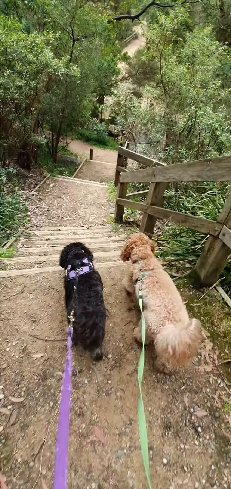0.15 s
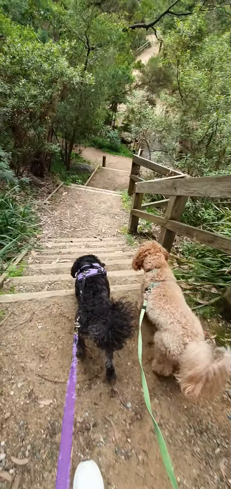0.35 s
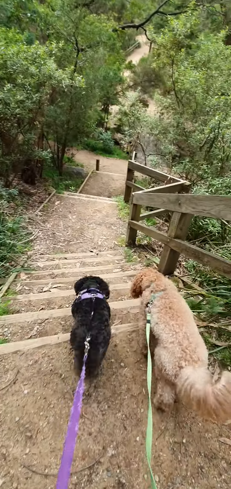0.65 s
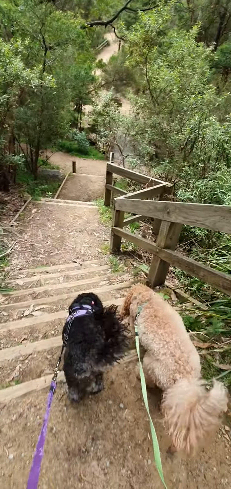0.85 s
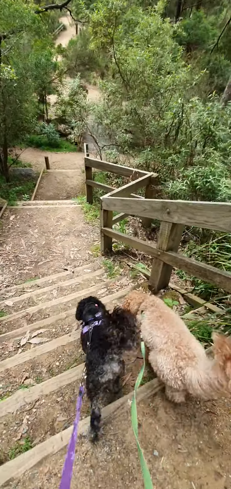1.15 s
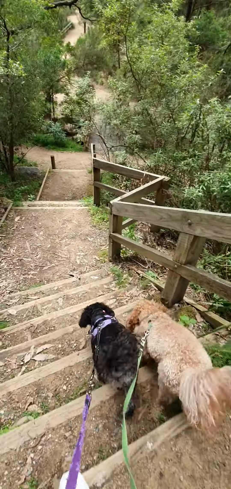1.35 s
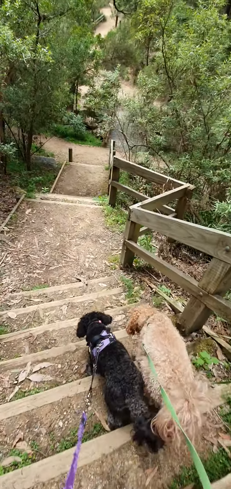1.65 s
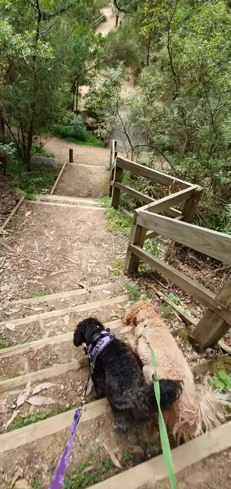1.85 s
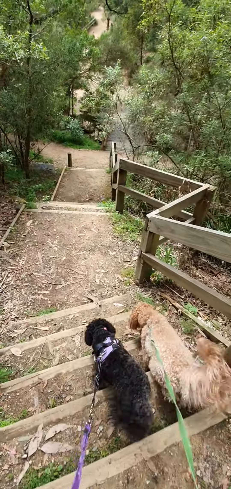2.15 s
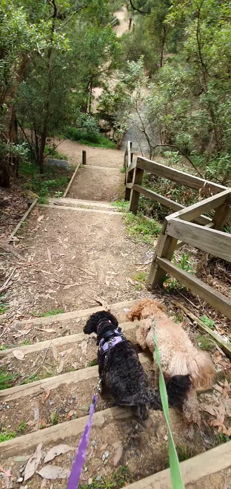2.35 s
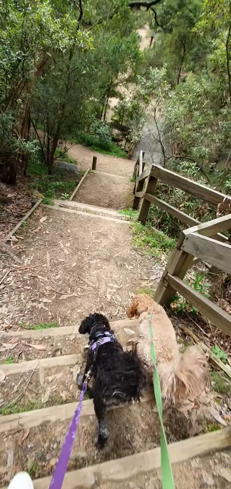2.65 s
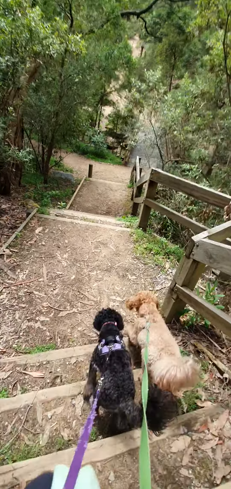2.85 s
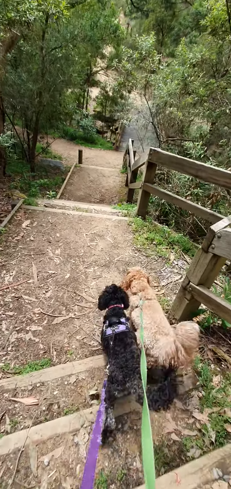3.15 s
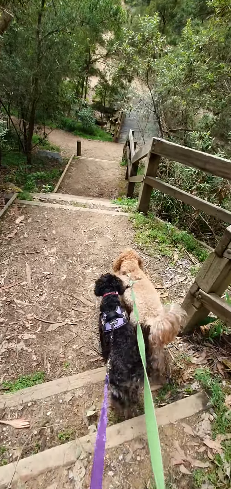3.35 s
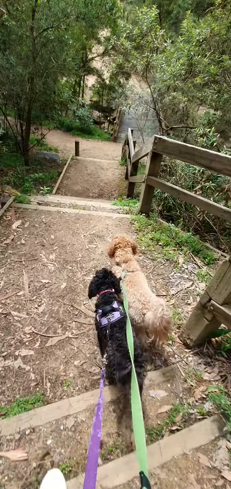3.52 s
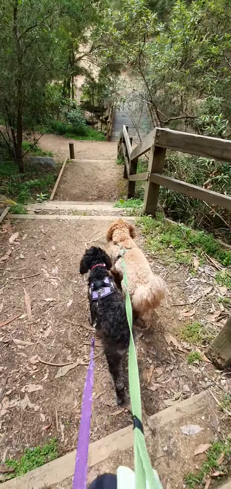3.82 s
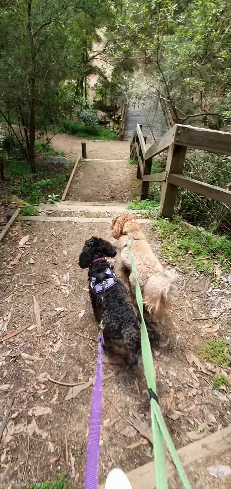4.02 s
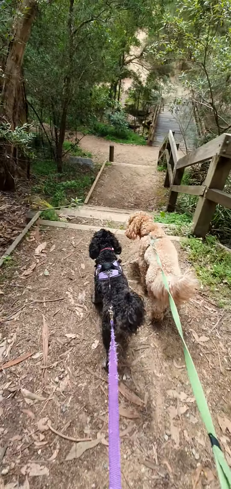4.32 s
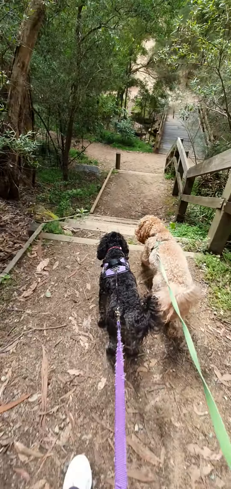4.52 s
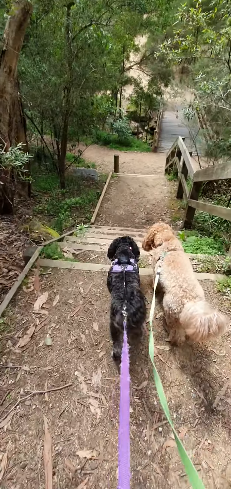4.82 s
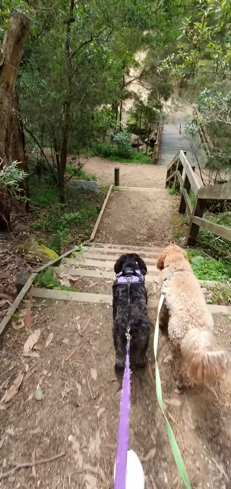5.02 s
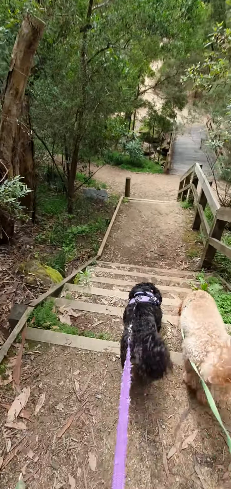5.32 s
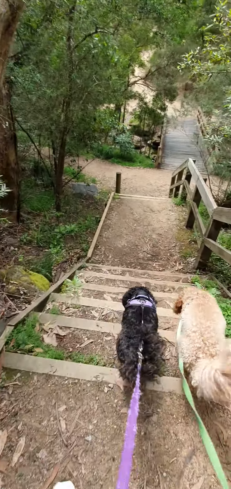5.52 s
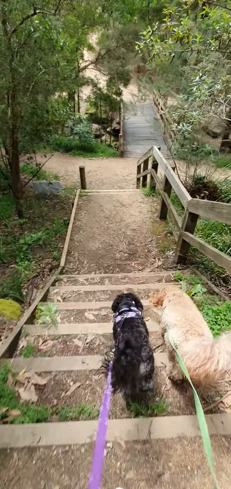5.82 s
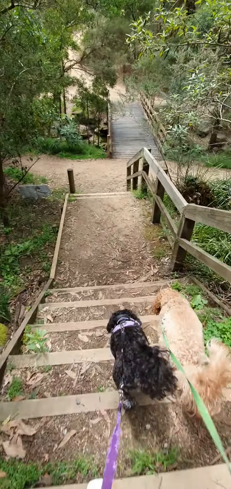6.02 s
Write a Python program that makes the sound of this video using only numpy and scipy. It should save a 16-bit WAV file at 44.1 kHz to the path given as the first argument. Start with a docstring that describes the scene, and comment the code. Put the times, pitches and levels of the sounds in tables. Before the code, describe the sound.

A walker and two leashed dogs go down timber-edged dirt steps in bushland. Gritty footfalls crunch over light paw patter and dry leaves. Small ticks come early, then a cluster of hollow lead-handle clacks around the middle. Little birds chirp throughout with airy echoes from the trees. Wind rumbles on the handheld microphone, mostly on the right.

```python
"""Shoes and paws scuff grit and dry leaves as a walker follows two leashed dogs down
timber-edged steps in bushland; lead fittings clack, small birds chirp, and a breeze buffets the microphone.
Grit and leaves are made of many tiny ringing grains; low thumps and metal are mostly fading sine tones.
Birds are gliding tones with an echo of shaped noise; wind is low noise, mostly stronger on the right."""
import sys
import numpy as np
from scipy import signal
from scipy.fft import rfft, irfft, next_fast_len
from scipy.io import wavfile
from scipy.ndimage import uniform_filter1d, map_coordinates

SR = 44100
rng = np.random.default_rng(int(sys.argv[2]) if len(sys.argv) > 2 else 0)


def digitize_waveform(pressure):
    """Quantize a signal to 16-bit integers and store it at the path in sys.argv[1].

    Rows of a 2-D input are taken as channels; values are limited to [-1, 1].
    """
    field = np.atleast_2d(pressure).T
    bounded = np.clip(field, -1, 1)
    quanta = np.round(bounded * 32767).astype(np.int16)
    wavfile.write(sys.argv[1], SR, quanta)


N = 272097
TIME = np.arange(N) / SR  # seconds

# Levels in these tables are relative: the functions below balance the layers.
# Gusts on the microphone. Each row: start in seconds, length in seconds, left level in dB, right level in dB.
GUSTS = [(0.024, 0.16, -51, -34), (0.997, 0.027, -54, -23.5), (1.125, 0.15, -55, -43.5),
         (1.421, 0.011, -41, -34.5), (1.478, 0.064, -49, -33), (1.894, 0.31, -56, -37.5),
         (2.041, 0.0075, -52, -31), (2.376, 0.02, -45, -51), (2.585, 0.69, -52, -43.5),
         (3.045, 0.018, -55, -33), (3.824, 0.19, -53.5, -50.5), (4.255, 0.036, -37.5, -46),
         (4.76, 0.047, -55, -39), (4.803, 0.02, -67, -31.5), (5.756, 0.011, -53, -39)]
GUST_RISE_S, GUST_FALL_S = 0.11, 0.16  # time to swell and to fade by 60 dB
# Light air between the gusts; the right port is more exposed.
AIR_DB, AIR_RIGHT_DB, AIR_WAVER_DB = -60.5, 4.5, 5.5
# Tone colour of the wind's low rumble. Each row: frequency in Hz, level in dB.
RUMBLE = [(15, -47), (30, -18.5), (55, 4), (88, 0.5), (125, -14), (200, -28.5), (600, -59), (1500, -74)]
# Tone colour of the faster wind flutter. Each row: frequency in Hz, level in dB.
FLUTTER = [(50, -22), (110, -0.5), (220, 1), (400, -25), (900, -48.5)]
# Tone colour of the steady bush hush. Each row: frequency in Hz, level in dB.
BUSH = [(88, -24), (150, 0), (341, -1.5), (484, -8.5), (2870, -26.5), (4160, -33), (16000, -35.5)]

# Echo among the trees. Each row: frequency in Hz, time to fade by 60 dB in seconds.
SCRUB = [(300, 0.15), (2500, 1), (4200, 0.98), (6500, 0.99), (12000, 0.28)]
# How alike left and right are. Each row: frequency in Hz, likeness from 0 to 1.
ALIKE = [(100, 1), (400, 0.77), (1000, 0.97), (2500, 0.1), (8000, 0.063)]

# Bird calls: a rising sweep that leaps to a pip (pip pitch 0 means sweep alone).
# Each row: time at the top of the sweep in seconds, top pitch in Hz, second partial level in dB,
# fundamental level in dB, final pip pitch in Hz, pip bend in Hz, pip level in dB, echo level in dB.
BIRD_CALLS = [(.147, 3490, -47.5, -54.5, 4134, -86, -49.5, -0.5), (0.692, 3610, -56, -72, 0, -2.5, 0, 6),
              (0.745, 3350, -49.5, -58.5, 4114, -71, -51, 1), (1.194, 2950, -74, -65, 0, 0, 2, 7),
              (1.263, 2990, -60, -63.5, 4168, 520, -53.5, 5.5), (1.352, 3630, -55, -65.5, 0, 0, 0, 4),
              (1.632, 2605, -62.5, -61, 3861, 497, -60.5, 8), (1.799, 3330, -57.5, -60, 0, 15, 7, 4.5),
              (1.898, 3670, -53.5, -69, 4850, -120, -61.5, 4),
              (2.105, 3340, -57.5, -63, 4135, 118, -57.5, 6), (2.431, 3488, -54, -63, 4852, 83, -54.5, 2),
              (2.524, 3460, -53, -57.5, 4353, 108, -45.5, 0), (3.125, 3360, -49, -58, 4327, 172, -49, 3.5),
              (3.738, 2806, -54, -63, 4170, 349, -50.5, 0.5),
              (4.464, 3220, -51.5, -62, 4262.5, 105, -52, 1),
              (4.963, 2790, -64.5, -64, 3560, -150, -57.5, 2.5),
              (5.149, 3410, -51.5, -59.5, 4312, 95, -48.5, -2),
              (5.808, 3520, -51.5, -58, 4276, -59, -59, -1.5),
              (6.113, 2820, -66, -67.5, 3861, 122, -66, 9.5)]
# Thin high tones: first a distant whistle, then a faint harness ring after a clack.
# Each row: start in seconds, length in seconds, pitch in Hz, level in dB.
THIN_TONES = [(2.59, 0.029, 6000, -61), (3.381, 0.085, 6100, -71.5)]
THIN_ECHO_DB = -3
# Upper partials leaving the bird's throat. Each row: frequency in Hz, level in dB.
THROAT = [(4200, 1.5), (5200, -2.5), (6900, -8.5), (7500, -1), (8500, -11.5), (11500, -5), (14000, -51)]
# How much stronger the birds and thin tones reach the right port. Each row: frequency in Hz, difference in dB.
BIRD_SIDE = [(3000, -2), (4100, -4.5), (5400, 18), (6800, 9), (8000, -8)]
SWEEP_HZ_PER_S, SWEEP_EASE = 24000, 1.35  # mean rate of rise; how a sweep levels off
FULL_SWEEP_HZ, FULL_SWEEP_S = 3500, .049  # a full sweep; lower ones are shorter
PIP_S, PIP_BEND_HZ_PER_S = 0.011, 15000  # shortest pip; bend that adds one second
PIP_WAVER = .017  # share by which the pitch of a pip trembles

# Clacks of the lead handles.
# Each row: start in seconds, level in dB, snap in dB relative to the hollow knock.
CLACKS = [(2.442, -30.5, -5), (2.571, -24.5, 3), (2.89, -28, -4), (3.0934, -16.5, -3), (3.108, -28.5, -14),
          (3.334, -21.5, 7), (3.385, -26.5, -3)]
# Ticks of lead clips and kicked twigs. Each row: start in seconds, level in dB, pitch in Hz.
TICKS = [(.747, -21, 2310), (0.7738, -19, 2250), (0.7922, -22.5, 2300), (.799, -32, 2250),
         (0.913, -36, 2270), (1.07, -29.5, 2070), (1.24, -31.5, 2420), (1.274, -30, 2060),
         (1.398, -33.5, 2420), (3.268, -26.5, 2390), (3.822, -30, 4050), (5.519, -33.5, 9100),
         (5.53, -36.5, 2850)]
TICK_CYCLES = 15.8  # cycles until a tick has died by 60 dB
# Chinks of the dogs' harness rings. Each row: start in seconds, level in dB.
CHINKS = [(2.296, -53), (2.953, -43), (5.498, -60)]
# Tones of a hollow handle. Each row: pitch in Hz, time to fade by 60 dB in seconds, level in dB.
HANDLE = [(605, 0.01, -32), (723, 0.013, 7)]
# Tones of a harness ring. Each row: pitch in Hz, time to fade by 60 dB in seconds, level in dB.
RING = [(6000, 0.18, 3), (6938, 0.112, 12.5), (10700, 0.37, -0.5), (14400, 0.068, 3)]
# Tone colour of a sharp snap. Each row: frequency in Hz, level in dB.
CRACK = [(300, -29), (900, -2.5), (1300, 9.5), (2200, 4.5), (3000, -2), (4400, -5), (7000, -8),
         (15000, -28.5)]

# Low thumps: the first two rows are wind bursts, the rest dull bumps on timber.
# Each row: start in seconds, level in dB, ring pitch in Hz, ring in dB relative to the push.
THUMPS = [(0.04, -46.5, 155, 24.5), (0.113, -40, 182, 12), (1.896, -25, 470, -7), (2.357, -20, 600, -6),
          (2.75, -33.5, 400, 9.5), (3.164, -30, 472, -2.5), (3.609, -29.5, 450, -7.5),
          (4.103, -25, 547, -2.5), (6.02, -51, 450, 16)]
THUMP_CYCLES = 10.3  # cycles until the ring has died by 60 dB

# Shoes and paws scuffing dirt, but the row at 3.11 s is a brief high hiss accompanying a bird's chirp.
# Each row: start of full weight in seconds, crunch level in dB,
# fine hiss level in dB, time to fade by 60 dB in seconds.
SCUFFS = [(0.0, -47, -58, 0.27), (0.461, -46, -61.5, 0.24), (0.951, -47.5, -65, 0.59),
          (1.22, -55, -68.5, 2.7), (1.392, -46, -73, 0.44), (1.48, -58, -60, 0.27),
          (2.0, -53.5, -70.5, 2.5), (2.425, -45.5, -70, 0.32), (2.499, -46.5, -65, 0.076),
          (2.61, -79, -68, 0.85), (2.797, -47.5, -65.5, 0.8), (3.11, -76, -63, 1.2), (3.25, -58, -61, 0.66),
          (3.709, -56.5, -65, 0.52), (3.798, -61, -62.5, 0.71), (4.187, -52, -72.5, 0.79),
          (4.605, -54, -63, 0.41), (5.614, -53.5, -62, 1.08), (6.12, -59.5, -68, 1.2)]
SCUFF_RISE_S, SCUFF_HOLD_S = 0.3, 0.009  # time to swell by 60 dB; time at full level
# The dogs' patter, fainter once they reach the flat landing. Each row: time in seconds, level in dB.
PATTER = [(0, -57.5), (3.3, -66), (4.5, -67), (5.4, -68.5), (6.17, -68)]
PATTER_HISS_DB, UNEVEN_DB = -11.5, 3  # fine hiss relative to the patter; unevenness of every scuff
# Heels coming down on gravel. Each row: start in seconds, level in dB.
HEELS = [(3.254, -38.5), (4.591, -43.5), (4.6, -42), (5.624, -40), (6.041, -46.5)]
# Small stones cracking under a sole. Each row: start in seconds, level in dB.
STONES = [(.434, -41), (0.466, -35), (0.991, -35), (2.419, -38), (4.611, -37), (6.052, -38)]
# Soft landings on packed earth. Each row: start in seconds, level in dB.
PATS = [(.457, -35.5), (0.947, -39.5), (3.705, -43), (5.625, -40), (5.14, -43), (6.033, -40)]
# Dry leaves crushed underfoot. Each row: start in seconds, level in dB.
LEAVES = [(0.423, -50), (.945, -50), (.99, -68), (.99, -55), (1.395, -50.5), (1.479, -53), (2.005, -61),
          (4.611, -76), (6.05, -55.5)]
# Tone colour of gravelly crunch. Each row: frequency in Hz, level in dB.
CRUNCH = [(120, 2.5), (300, 1.5), (750, 2.5), (1100, 0.5), (1600, 0.5), (2400, -2.5), (3300, -13),
          (7000, -7.5), (12000, -47)]
# Tone colour of fine hiss. Each row: frequency in Hz, level in dB.
HISS = [(2000, 10.5), (4000, 8.5), (6300, 4), (7400, 1), (8500, 6.5), (10500, 2), (14000, -1), (16000, -22)]
# Tone colour of packed earth. Each row: frequency in Hz, level in dB.
EARTH = [(200, -14.5), (650, -3), (2500, -37)]
# Tone colour of dry leaves. Each row: frequency in Hz, level in dB.
LEAF = [(1200, -14.5), (2350, -1.5), (3600, -22.5)]

TOP_HZ = 15850  # highest frequency the phone keeps


def amp(db):
    """Turn decibels into gain."""
    return 10 ** (np.asarray(db) / 20)


def unit(x):
    """Scale to an rms (average strength) of 1."""
    return x / np.sqrt(np.mean(x ** 2) + 1e-20)


def along(points, hz):
    """Read values between table points, on a logarithmic frequency axis."""
    f, v = np.transpose(points)
    return np.interp(np.log(hz + 1), np.log(f + 1), v)


def curves(rows):
    """Give one value per sample for each column after the time."""
    s, *cols = np.transpose(rows)
    return [np.interp(TIME, s, c) for c in cols]


def filtered(x, response):
    """Multiply a sound by a response that depends on frequency."""
    n = x.shape[-1]
    m = next_fast_len(n + 8192)
    return irfft(rfft(x, m) * response(np.fft.rfftfreq(m, 1 / SR)), m)[..., :n]


def coloured(x, spectrum):
    """Give a sound a tone colour, at rms 1."""
    return unit(filtered(x, lambda hz: amp(along(spectrum, hz))))


def add(track, s, sound):
    """Mix a sound into a track at time s in seconds."""
    i = max(0, round(s * SR))
    part = track[..., i:i + sound.shape[-1]]
    part += sound[..., :part.shape[-1]]


def spread(pair):
    """Turn two unrelated signals into left and right, alike in the bass."""
    turn = lambda hz: np.arccos(np.clip(along(ALIKE, hz), -1, 1)) / 2
    mid, side = filtered(pair, lambda hz: np.array([np.cos(turn(hz)), np.sin(turn(hz))]))
    return np.array([mid + side, mid - side])


def placed(x, lag_ms, right_db):
    """Make a sound reach the right port earlier by lag_ms, and louder by right_db."""
    half = np.array([[-.5], [.5]])
    lag = lag_ms / 1000
    return amp(half * right_db) * filtered(x, lambda hz: np.exp(2j * np.pi * hz * lag * half))


def ring(modes, t, detune):
    """A struck object sounds several fading tones, slightly different in pitch at every blow."""
    out = 0
    for hz, t60, db in modes:
        struck_hz = hz * (1 + detune * rng.standard_normal())
        out = out + amp(db - 60 * t / t60) * np.sin(2 * np.pi * struck_hz * t)
    return out


def grit(rate, grain_hz, spread_db, bed):
    """Tiny fractures of unequal size and pitch ring over rubbing noise, as two unrelated signals."""
    when, size, pitch, side = rng.random((int(rate * N / SR), 4)).T
    t = np.arange(SR // 200) / SR
    cycles = grain_hz * 2 ** (3.4 * (pitch[:, None] - .5)) * t
    size_db = spread_db * np.minimum(-np.log(1 - size), 3)
    gain = amp(size_db)[:, None] * 2 ** (3.4 * pitch[:, None])
    grains = gain * np.sin(2 * np.pi * cycles) * np.exp(-cycles / 1.13)
    # both channels lie end to end while the grains are summed
    start = (when * (N - len(t))).astype(int) + N * (side > .5)
    index = start[:, None] + np.arange(len(t))
    pair = np.bincount(index.ravel(), grains.ravel(), 2 * N).reshape(2, N)
    return unit(pair) + bed * rng.standard_normal((2, N))


def impact(spectrum, n):
    """A sharp blow: a pulse of peak 1 with the given tone colour and no sound before it starts."""
    cepstrum = irfft(np.log(amp(along(spectrum, np.fft.rfftfreq(2 * n, 1 / SR)))))
    # folding the cepstrum forward in time puts the energy at the start
    cepstrum[1:n] *= 2
    cepstrum[n + 1:] = 0
    pulse = irfft(np.exp(rfft(cepstrum)))[:n]
    return pulse / np.abs(pulse).max()


def wobble(rate):
    """Draw a smooth random curve with rate random points a second."""
    return map_coordinates(rng.standard_normal(int(N * rate / SR) + 4), [TIME * rate])


def swell(s, hold, rise, fall):
    """A level curve in dB that rises to 0 at time s, holds, then falls."""
    before = np.maximum(s - TIME, 0)
    after = np.maximum(TIME - s - hold, 0)
    return -60 * np.minimum(before / rise + after / fall, 2)


def together(levels_db):
    """Add the powers of unrelated sounds to find their joint level in dB."""
    return 10 * np.log10(sum(amp(db) ** 2 for db in levels_db))


def scrub(x):
    """Trunks and leaves scatter an echo: noise that fades at its own speed in each frequency band."""
    hz, t, z = signal.stft(rng.standard_normal((2, SR)), SR, nperseg=256)
    fade = amp(-60 * t / along(SCRUB, hz)[:, None])
    early_boost = 1 + 1.64 * np.exp(-t / 0.045)
    tail = signal.istft(z * fade * early_boost, SR, nperseg=256)[1]
    tail = tail / np.linalg.norm(tail[0])
    # the echo starts 5 ms after the direct sound
    delayed = np.pad(tail, ((0, 0), (SR // 200, 0)))
    return signal.fftconvolve(np.atleast_2d(x), delayed, axes=1)[:, :x.shape[-1]]


def gusting():
    """Wind level at the left and right port: gusts rise out of light, wavering air."""
    waver = AIR_WAVER_DB * np.array([wobble(rate=6.9), wobble(rate=9)])
    levels = [AIR_DB + np.array([[0], [AIR_RIGHT_DB]]) + waver]
    for s, length, left_db, right_db in GUSTS:
        levels.append(np.array([[left_db], [right_db]]) + swell(s, length, GUST_RISE_S, GUST_FALL_S))
    return together(levels)


def breeze():
    """Eddies, or swirls of air, thump each port separately over the steady hush of the bush."""
    level_db = gusting()
    eddies = coloured(rng.standard_normal((2, N)), RUMBLE)
    # even out the eddies, so that their strength follows the gust
    power = np.abs(uniform_filter1d(eddies ** 2, size=1200))
    eddies = unit(eddies / np.sqrt(power + 0.11))
    # strong gusts break into smaller, faster eddies
    flutter = amp(1.42 * level_db + 1.0) * coloured(rng.standard_normal((2, N)), FLUTTER)
    hush = coloured(spread(rng.standard_normal((2, N))), BUSH)
    return amp(level_db + 7.0) * eddies + flutter + amp(-59.0) * placed(hush, lag_ms=0.03, right_db=2.0)


def note(pitch, partials, edge, waver=0.011):
    """A note stacks tones at multiples of one trembling pitch; partials lists their gains."""
    tremble = unit(uniform_filter1d(rng.standard_normal(len(pitch)), size=120))
    phase = 2 * np.pi * np.cumsum(pitch * (1 + waver * tremble)) / SR
    tone = sum(gain * np.sin(k * phase) for k, gain in enumerate(partials, 1))
    fades = signal.get_window(("tukey", np.clip(edge, 0, 1)), len(pitch))
    # the loudness trembles too, by the same curve reversed
    return np.sqrt(2) * tone * amp(3.1 * tremble[::-1]) * fades


def sweep_length(top_hz):
    """The higher a sweep reaches, the longer it takes, in seconds."""
    return FULL_SWEEP_S * (top_hz / FULL_SWEEP_HZ) ** 2


def chirp(top_hz, second_db, first_db, pip_hz, bend_hz, pip_db):
    """A chirp sweeps up, mostly strongest in its second partial, then may jump to a pip."""
    length = sweep_length(top_hz)
    out, u = np.zeros(SR), np.linspace(0, 1, round(length * SR))
    pitch = top_hz - SWEEP_HZ_PER_S * length * (1 - u) ** SWEEP_EASE
    # the fundamental comes through as the pitch rises, while the upper partials swell and fade
    fundamental = amp(first_db + 18 - 20 * (1.5 - u))
    arch = np.abs(np.sin(np.pi * u ** 1.41))
    upper = [amp(second_db + db + along(THROAT, k * pitch)) * arch
             for k, db in enumerate([2, -11.5, -12], 2)]
    add(out, 0, note(pitch, [fundamental] + upper, edge=0.2))
    if pip_hz > top_hz:
        # the pip bends to its final pitch, and lasts longer the further it bends
        pip_length = PIP_S + abs(bend_hz) / PIP_BEND_HZ_PER_S
        v = np.linspace(0, 1, round(pip_length * SR))
        pip_pitch = pip_hz - bend_hz * (1 - v) ** SWEEP_EASE
        pip = note(pip_pitch, [1, .1], edge=0.91, waver=PIP_WAVER)
        add(out, length - .002, amp(pip_db) * pip)
    return out


def birds_and_thin_tones():
    """Calls and thin tones arrive directly, then by paths through scrub; hidden birds are mostly echo."""
    direct, echo = np.zeros(N), np.zeros((2, N))
    sounds = []
    for s, top_hz, *voice, echo_db in BIRD_CALLS:
        sounds.append((s - sweep_length(top_hz), chirp(top_hz, *voice), echo_db))
    for s, length, hz, db in THIN_TONES:
        tone = amp(db) * note(np.full(round(length * SR), hz), [1], edge=0.29)
        # silence after the tone leaves room for its echo
        sounds.append((s, np.pad(tone, (0, SR)), THIN_ECHO_DB))
    for s, sound, echo_db in sounds:
        add(direct, s, sound)
        add(echo, s, amp(echo_db) * scrub(sound))
    ports = filtered(direct, lambda hz: amp(np.array([[-.5], [.5]]) * along(BIRD_SIDE, hz)))
    return ports + placed(echo, lag_ms=0, right_db=1.5)


def leads():
    """Handles knock hollowly with a sharp snap; clips and twigs tick; harness rings chink."""
    knocks, snaps, rings = np.zeros(N), np.zeros((2, N)), np.zeros((2, N))
    t = np.arange(SR // 10) / SR

    def rattle(t60):
        """A burst of noise fades by 60 dB in t60 seconds."""
        return coloured(spread(rng.standard_normal((2, len(t)))), CRACK) * amp(-60 * t / t60)

    snap = impact(CRACK, len(t))
    for s, db, snap_db in CLACKS:
        knock = ring(HANDLE, t, detune=0.0093) * (1 - np.exp(-t / 0.00088))
        add(knocks, s, amp(db) * knock)
        add(snaps, s, amp(db + snap_db) * (0.9 * snap + 0.46 * rattle(t60=0.015)))
    for s, db, hz in TICKS:
        tick = ring([(hz, TICK_CYCLES / hz, -1)], t, detune=0) * (1 - np.exp(-t / 0.0001))
        add(snaps, s, amp(db) * (tick + 0.041 * rattle(t60=0.067)))
    for s, db in CHINKS:
        chink = np.array([ring(RING, t, detune=0.0038), ring(RING, t, detune=0.0142)])
        add(rings, s, amp(db - 15.5) * chink)
        jingle = coloured(rng.standard_normal((2, len(t))), HISS)
        add(rings, s, amp(db - 13 - 60 * t / 0.23) * jingle)
    return placed(knocks, lag_ms=0.45, right_db=4.5) + placed(snaps, lag_ms=0.453, right_db=7.0) + rings


def thumps():
    """Wind bursts, then soft blows on timber: each is a low push, a gritty touch and a brief damped ring."""
    out, t = np.zeros(N), np.arange(SR // 10) / SR
    contact = np.roll(impact(CRUNCH, len(t)), SR // 2000)
    u = t / 0.00095
    push = 1.2 * (u - 1.3) * np.exp(-(u - 1.7) ** 2) * (1 - np.exp(-4 * u))
    for s, db, ring_hz, ring_db in THUMPS:
        fade = amp(ring_db - 60 * t * ring_hz / THUMP_CYCLES)
        tone = -fade * np.sin(2 * np.pi * ring_hz * t) * (1 - np.exp(-t / 0.00008))
        add(out, s - .0005, amp(db) * (push + tone - 0.15 * contact))
    return placed(out, lag_ms=0.3, right_db=2.5)


def leaves():
    """Dry leaves break under a foot in a short run of separate crackles."""
    level_db = together([db + swell(s, hold=0.029, rise=0.092, fall=0.27) for s, db in LEAVES])
    fractures = grit(rate=700, grain_hz=2300, spread_db=3, bed=.35)
    # each side also hears half of the other
    return amp(level_db) * coloured(fractures + 0.5 * fractures[::-1], LEAF)


def pads():
    """A soft landing gives a short, dull pat of noise on the packed earth."""
    load, t = np.zeros(N), np.arange(SR // 10) / SR
    for s, db in PATS:
        add(load, s, amp(db - 60 * t / 0.031))
    return load * coloured(rng.standard_normal(N), EARTH)


def scuffing():
    """Crunch and hiss levels: feet load the dirt and let it settle over pattering paws; one hiss joins a chirp."""
    patter_db, = curves(PATTER)
    crunch, hiss = [patter_db], [patter_db + PATTER_HISS_DB]
    for s, crunch_db, hiss_db, t60 in SCUFFS:
        shape_db = swell(s, SCUFF_HOLD_S, SCUFF_RISE_S, t60)
        crunch.append(crunch_db + shape_db)
        hiss.append(hiss_db + shape_db)
    uneven = UNEVEN_DB * wobble(rate=45)
    return together(crunch) + uneven, together(hiss) + uneven


def footsteps():
    """Soles crunch dirt, heels crush gravel and crack stones; fine sand hisses, plus one hiss with a chirp."""
    crunch_db, hiss_db = scuffing()
    gravel = grit(rate=800, grain_hz=1600, spread_db=5, bed=.6)
    crunch = amp(crunch_db - 3.0) * coloured(spread(gravel), CRUNCH)
    fine = grit(rate=1000, grain_hz=5700, spread_db=22.5, bed=2.5)
    hiss = amp(hiss_db + 8.0) * coloured(spread(fine), HISS)
    load, t = np.zeros(N), np.arange(SR // 5) / SR
    for s, db in HEELS:
        add(load, s, amp(db - 60 * t / 0.18))
    for s, db in STONES:
        add(load, s, amp(db - 60 * t / 0.013))
    coarse = grit(rate=1200, grain_hz=1310, spread_db=0.5, bed=0.65)
    heels = load * coloured(spread(coarse), CRUNCH)
    ground = amp(2.5) * crunch + heels + leaves() + pads()
    return placed(ground, lag_ms=0.36, right_db=2.5) + placed(hiss, lag_ms=0.27, right_db=-1.5)


def scene():
    """Steps, leads and thumps are nearly dry, with only a faint echo; the birds sit deep in the scrub."""
    near = leads() + thumps() + footsteps()
    return breeze() + birds_and_thin_tones() + amp(-18.5) * scrub(near) + near


def record(dry):
    """The phone keeps nothing above its band limit."""
    return filtered(dry, lambda hz: hz < TOP_HZ)


dry = scene()
out = record(dry)
digitize_waveform(out)
```